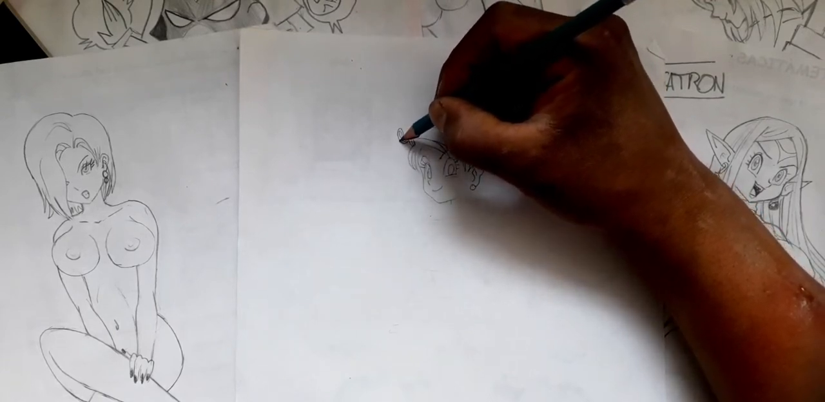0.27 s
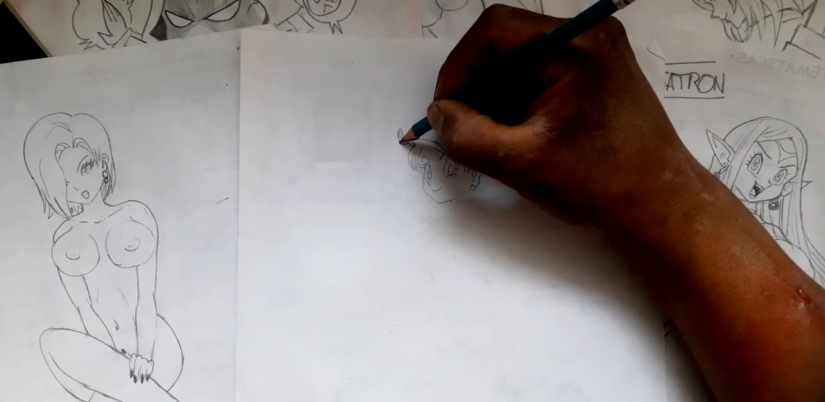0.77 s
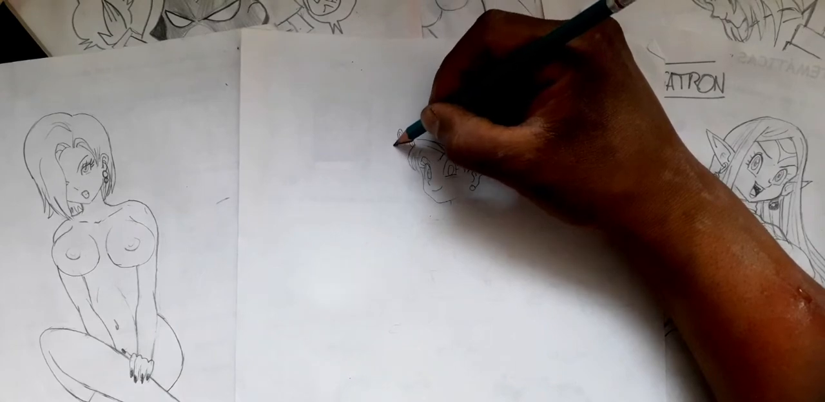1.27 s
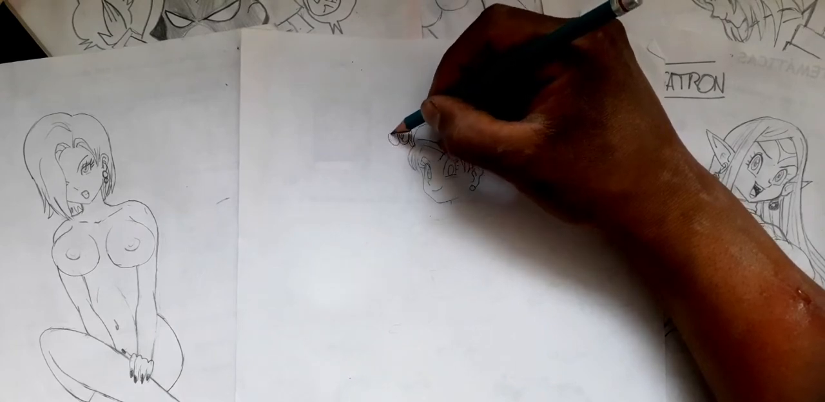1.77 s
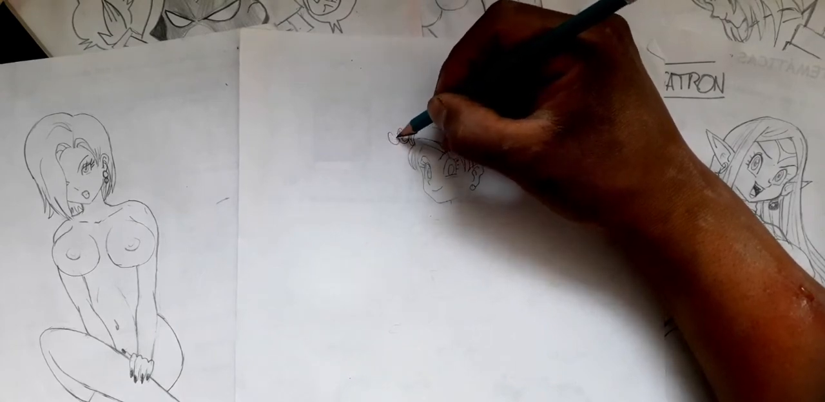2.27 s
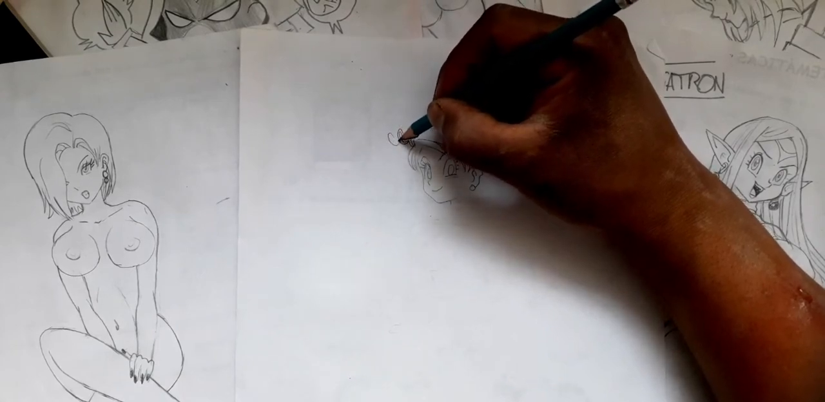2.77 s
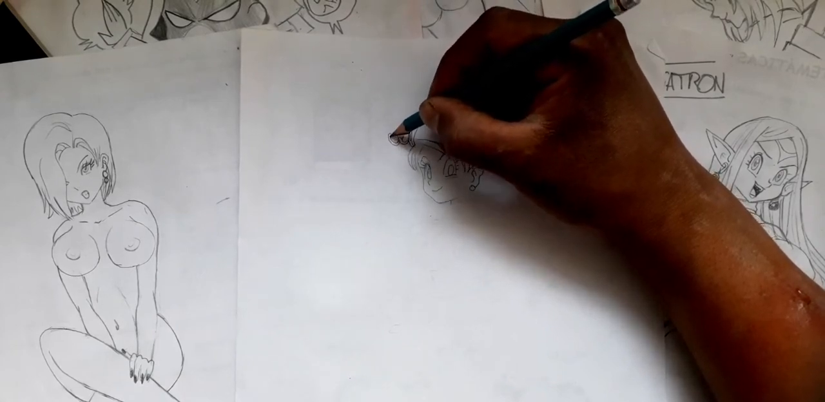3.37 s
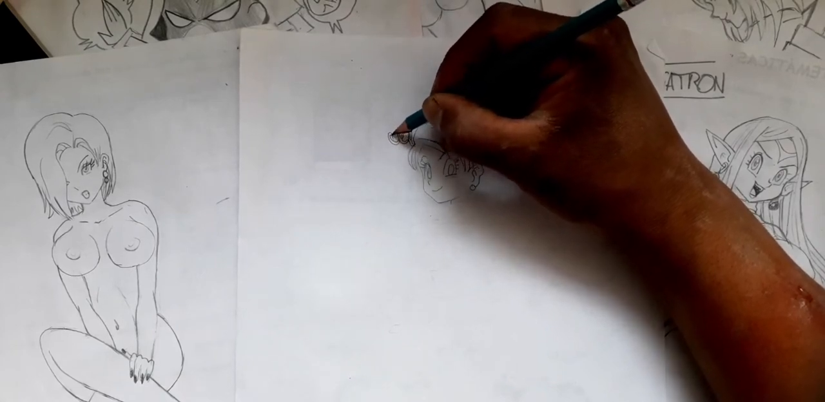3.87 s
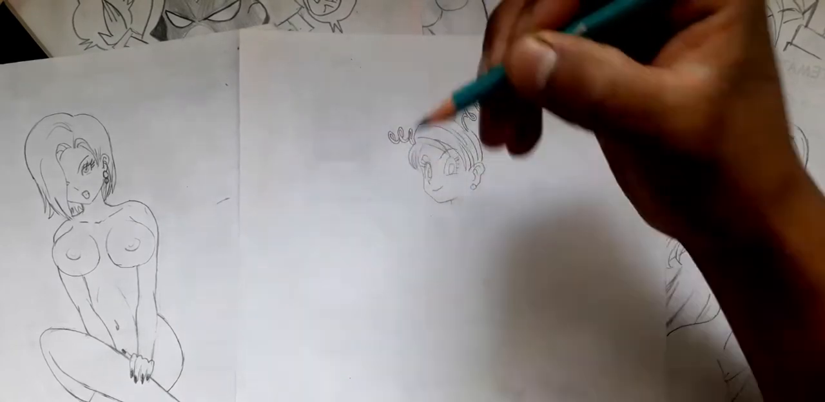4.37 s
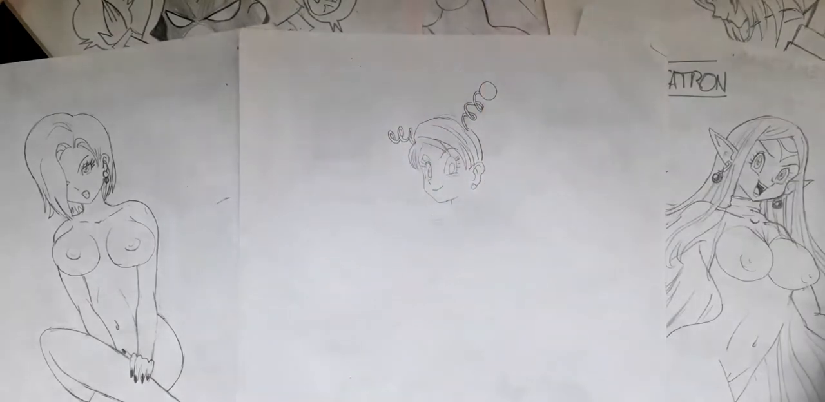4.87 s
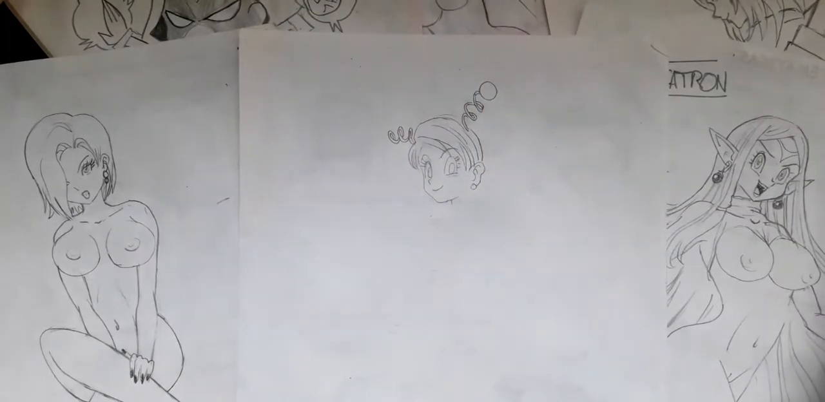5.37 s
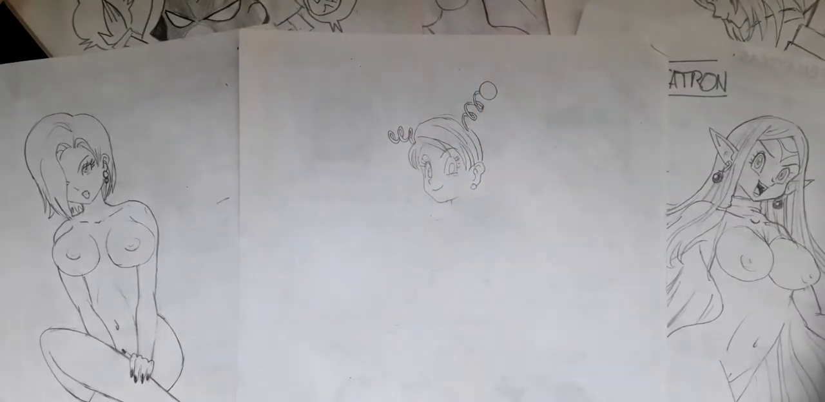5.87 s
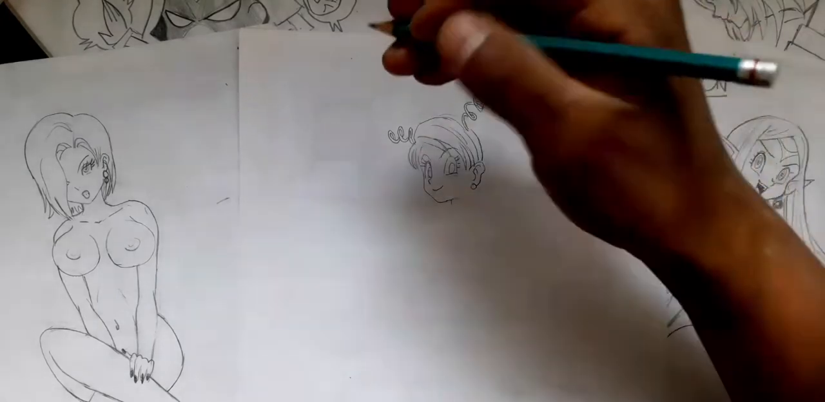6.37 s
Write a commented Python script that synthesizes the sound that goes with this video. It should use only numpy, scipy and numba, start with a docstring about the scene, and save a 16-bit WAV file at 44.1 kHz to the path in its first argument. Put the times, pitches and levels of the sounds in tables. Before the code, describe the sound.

Quiet room with dull traffic and hiss; light pencil scratches, then paper slides and small taps as an engine outside hums and revs upward.

```python
"""A pencil sketches short strokes on paper close by: random slips excite the resonances of shaft and lead.
Hand and arm slide with a filtered rustle, and small ticks snap and thud on the desk.
Outside a vehicle drones as one sinusoid; overlapping its end, a rising stack of harmonics in the room's low
modes pulls away. Airy tones are narrow-band noise over a sinusoid: faint far ones, and the low paper and desk
resonance under pencil strokes. Behind lie dull traffic of coloured noise and microphone hiss."""
import sys
import numpy as np
from scipy import signal
from scipy.fft import rfft, irfft, next_fast_len
from scipy.io import wavfile
from scipy.ndimage import uniform_filter1d
from numba import njit

SR = 44100
rng = np.random.default_rng(int(sys.argv[2]) if len(sys.argv) > 2 else 0)


def rack_gain(trim_db):
    """Turn a fader trim in dB into the linear factor to multiply a signal by."""
    fader = np.asarray(trim_db, float)
    return 10 ** (fader / 20)


def unload_wav(signal):
    """Save mono or channel-first audio to the path in sys.argv[1] as 16-bit WAV at rate SR, clipped to [-1, 1]."""
    wavfile.write(
        sys.argv[1],
        SR,
        np.round(np.clip(np.atleast_2d(signal).T, -1, 1) * 32767).astype(np.int16),
    )


N = 291809
T = np.arange(N) / SR  # time of each sample in s
FAR_DB = -83  # reference roar level of far traffic


def level(x, db):
    """Mean-square normalisation: scales to an rms level in dB re 1."""
    return x * rack_gain(db) / np.sqrt(np.mean(x ** 2))


def coloured(points, x=None):
    """Spectral shaping: noise (or x) filtered through (f/Hz, level/dB) points, silent above them, rms 1."""
    hz, db = np.transpose(points)
    size = next_fast_len(N)
    bins_hz = np.arange(size // 2 + 1) * SR / size
    # the 1 Hz offset avoids the logarithm of zero
    gain = rack_gain(np.interp(np.log(bins_hz + 1), np.log(hz), db, right=-200))
    source = rng.standard_normal(N) if x is None else x
    return level(irfft(rfft(source, size) * gain, size)[:N], 0)


def ring(x, modes):
    """Modal superposition: a body answers in parallel (f/Hz, width/Hz, level/dB) resonances."""
    return sum(rack_gain(db) * signal.lfilter(*signal.iirpeak(hz, hz / width, SR), x) for hz, width, db in modes)


def steep(x, modes):
    """Cascaded resonance: each mode is passed twice for deeper valleys between modes; rms 1."""
    return level(sum(ring(ring(x, [m]), [(m[0], m[1], 0)]) for m in modes), 0)


@njit
def sweep(x, hz, width):
    """State-variable resonance: a band-pass of given width in Hz whose centre moves."""
    y, band, low = np.empty(len(x)), 0., 0.
    for i in range(len(x)):
        g, k = np.tan(np.pi * hz[i] / SR), width / hz[i]
        v = (band + g * (x[i] - low)) / (1 + g * (g + k))
        band, low, y[i] = 2 * v - band, low + 2 * g * v, k * v
    return y


def walk(rate):
    """Low-passed random modulation: levels held 1 / rate s and averaged twice; spread near 1."""
    k = int(SR / rate)
    held = np.repeat(rng.standard_normal(N // k + 1), k)
    return 1.48 * uniform_filter1d(uniform_filter1d(held, k), k)[:N]


def grit(per_s, scatter_db):
    """Stick-slip as a random impulse train: tiny slips over the fibres, uneven in size and sign."""
    slips = rng.random(N) < per_s / SR
    return slips * rng.standard_normal(N) * rack_gain(scatter_db * rng.exponential(size=N))


def curve(rows):
    """Linear interpolation of (t/s, value) rows at every sample."""
    return np.interp(T, *np.transpose(rows))


def swells(rows, point, share=False):
    """Incoherent power sum of quarter-sine rises and falls; share adds the last column to the peak level.

    A point under 1 gives a broad top, over 1 a peaked one."""
    shortest_s = .025  # least rise or fall
    power = np.zeros(N)
    for peak, rise, fall, db, last in rows:
        start, end = peak - max(rise, shortest_s), peak + max(fall, shortest_s)
        part = slice(int(start * SR), int(end * SR))
        ramp = np.interp(T[part], [start, peak, end], [0, 1, 0])
        shape = np.sin(np.pi / 2 * ramp) ** point
        power[part] += (shape * rack_gain(db + share * last)) ** 2
    return np.sqrt(power)


def pencil():
    """Stick-slip excitation: graphite catches on the paper's tooth and rings the shaft; pressure trembles."""
    # strokes: peak t/s, rise t/s, fall t/s, envelope peak level/dB, pressed lead re stroke level/dB
    strokes = [(1.244, .07, .045, -78, -8), (1.46, 0.23, 0.17, -73.5, -2.5), (2.955, .11, .05, -83.5, -1),
               (3.17, 0.23, 0.22, -76, -6.5), (3.65, 0.12, .08, -73.5, -2), (4.055, 0.064, 0.058, -66, 3)]
    # shaft modes: f/Hz, width/Hz, level/dB
    shaft_modes = [(9650, 700, 0), (11600, 600, -7), (12450, 600, -3)]
    # lower modes under pressure: f/Hz, width/Hz, level/dB
    lead_modes = [(4850, 600, -6), (7200, 900, -4), (8100, 900, 0), (8830, 700, -2)]
    point = 1.4
    pressure = rack_gain(1.6 * walk(60))
    slips = grit(9000, 2.2) * pressure
    scrape_spectrum = [(3000, -16), (6000, -6), (9000, 0), (13500, -3), (15000, -18)]  # f/Hz, level/dB
    scrape = rack_gain(-3) * coloured(scrape_spectrum, grit(9000, 1.3) * pressure)
    shaft = (steep(slips, shaft_modes) + scrape) * swells(strokes, point)
    lead = steep(slips, lead_modes) * swells(strokes, point, True)
    return shaft + lead


def hand():
    """Sliding friction of skin and cloth: a bright rustle with a moving centre, and a duller scuff."""
    # slides on paper and cloth: peak t/s, rise t/s, fall t/s, envelope peak level/dB, scuff re slide level/dB
    slides = [(.35, .19, 0.17, -74, -4), (.86, 0.13, 0.19, -76.5, -3), (4.26, 0.072, .08, -72, -6.5),
              (4.34, 0.064, 0.042, -63.5, -21), (4.39, 0.036, 0.065, -71, 3), (4.6, .14, 0.08, -72, -19),
              (4.765, 0.095, 0.081, -64, -10), (4.9, 0.12, .15, -68, -5), (4.85, .65, 0.34, -69.5, -3),
              (5.35, 0.55, 0.33, -70, -5), (5.8, 0.22, 0.39, -76.5, -3.5), (5.845, 0.037, 0.04, -69.5, -22),
              (6.09, 0.21, 0.11, -70, -7.5), (6.2, .5, 0.43, -81.5, -6), (6.57, 0.15, .12, -66, -6)]
    # spectral density of the rustle: f/Hz, level/dB
    bright_spectrum = [(3500, -13.5), (5500, -6), (6500, -3), (8500, -0.5), (10000, -3), (11000, -8),
                       (13000, -7.5), (14000, -17), (16000, -20)]
    # spectral density of the scuff: f/Hz, level/dB
    dull_spectrum = [(1200, -18), (2200, -6.5), (3200, -6), (3900, -0.5), (4600, -7.5), (5200, -5.5),
                     (6500, -19)]
    # centre of the rustle as the contact changes: t/s, f/Hz
    rustle = [(.2, 8700), (.33, 9200), (.8, 8300), (4.35, 8640), (4.6, 9350), (5.15, 9160), (5.35, 8300),
              (5.84, 8340), (6.08, 8800), (6.5, 7900)]
    point = 1.4
    hz = curve(rustle)
    slips = grit(14000, 1.5) * rack_gain(.8 * walk(40))
    band = sweep(sweep(grit(14000, 1.5), hz, 1200.), hz, 1200.)
    centre = level(band, -5.5) * rack_gain(2 * walk(7))  # comes and goes
    bright = coloured(bright_spectrum, slips) + centre
    dull = coloured(dull_spectrum, grit(6000, 0.94)) * rack_gain(1.35 * walk(30))
    return swells(slides, point) * bright + swells(slides, point, True) * dull


def ticks():
    """Impact response: a snap that dies in a few ms, a thud from the desk and a short room tail."""
    # ticks of paper and pencil: t/s, snap peak level/dB, f/Hz, desk thud re snap level/dB
    tick_rows = [(4.242, -55, 8500, -24), (4.3784, -52.5, 3100, 10), (4.5544, -62, 7450, -20),
                 (4.643, -54, 8080, -19), (5.13, -53, 6000, -15), (5.295, -72, 1500, -2),
                 (5.619, -64.5, 1490, 7), (6.493, -52, 8300, -15), (6.567, -46, 9000, -19),
                 (6.587, -44, 6200, -1), (6.610, -34, 7600, -4)]
    # desk mode: f/Hz, width/Hz, level/dB
    desk_mode = [(920, 890, 0)]
    length = 4000  # samples
    out, t = np.zeros(N + length), T[:length]
    decay = np.exp(-t / .001) + .07 * np.exp(-t / .03)  # snap and tail, time constants in s
    for s, db, hz, thud_db in tick_rows:
        blow = rng.standard_normal(length) * decay
        snap = steep(blow, [(hz, .7 * hz, 0)])
        thud = ring(blow, desk_mode)
        tick = snap / np.abs(snap).max() + rack_gain(thud_db) * thud / np.abs(thud).max()
        start = int(s * SR)
        out[start:start + length] += rack_gain(db) * tick
    return out[:N]


def tones():
    """Narrow-band resonance: noise over a steady sinusoidal core, swelling and fading softly."""
    # airy tones: faint far ones, and the low paper and desk resonance under pencil strokes (860 to 983 Hz):
    # t/s, length t/s, f/Hz, half the resonance width/Hz, level before the swell/dB
    tone_rows = [(0.043, 0.16, 654, 50, -72.5), (0.346, 0.1, 715, 23, -65.5), (0.422, 0.12, 694, 57, -72.5),
                 (1.149, 0.48, 920, 120, -77), (2.876, 0.18, 860, 99, -72.5), (3.085, 0.19, 983, 80, -74),
                 (4.71, 0.19, 4840, 270, -71.5), (4.744, 0.42, 2290, 76, -76.5),
                 (5.279, 0.15, 1270, 98, -71), (5.654, 0.14, 1936, 34, -68.5),
                 (5.825, 0.14, 2424, 35, -64.5)]
    size = SR // 2
    out, t = np.zeros(N + SR), T[:size]
    for s, length, hz, width, db in tone_rows:
        shape = np.sin(np.pi * np.clip(t / length, 0, 1) ** 0.7) ** 1.3
        air = steep(rng.standard_normal(size), [(hz, 2 * width, 0)])
        core = 20 / width * np.sin(2 * np.pi * hz * t)  # stronger in narrower tones
        start = int(s * SR)
        out[start:start + size] += shape * level(air + core, db)
    return out[:N]


def drone():
    """Tonal engine order: one sinusoid among the room's lowest modes, swelling and wavering."""
    # swells of the drone, the last ones overlapping the start of the pull:
    # peak t/s, rise t/s, fall t/s, envelope peak level/dB, f/Hz
    drone_rows = [(2.64, .2, 0.076, -44, 87.6), (2.961, 0.23, 0.29, -35.5, 84.7),
                  (3.3, 0.051, 0.095, -41.5, 83.5), (3.5, 0.12, .13, -36.5, 86.1),
                  (3.719, 0.048, 0.076, -43, 88.1), (4.02, 0.29, .17, -40, 89.46),
                  (4.23, 0.041, 0.048, -43.5, 92.9), (4.32, 0.049, 0.096, -43.5, 85.5)]
    hz = curve(np.array(drone_rows)[:, [0, 4]])
    tone = np.sqrt(2) * np.sin(2 * np.pi * np.cumsum(hz) / SR)  # rms 1
    return swells(drone_rows, 0.72) * rack_gain(1.24 * walk(21)) * tone


def engine():
    """Fourier series of uneven firings: unsteady multiples of the cycle rate, smeared in time on their way."""
    # engine load: t/s, level before the room/dB
    load = [(3.9, -57.5), (4.3, -57.5), (4.7, -50.5), (5.1, -48), (5.5, -47), (5.9, -51.5), (6.25, -47.5),
            (6.62, -54)]
    # strength of each multiple of the cycle rate: multiple, level/dB
    orders = [(4, -11), (5, 0.5), (6, -8.5), (7, 10), (8, 3), (9, -2), (10, -1.5), (11, 0.5), (12, -2.5),
              (13, -4), (14, -22), (15, -9.5), (16, -25), (17, -17), (18, -17.5)]
    pull_s, pull_hz = 3.9, 12.7  # start of the pull in s, cycles per s there
    gain_hz_s, drag_hz_s2 = 3.45, .295  # rise of the cycle rate and its slowing
    start = int(pull_s * SR)
    t = T[:N - start]
    speed = pull_hz + gain_hz_s * t - drag_hz_s2 * t ** 2
    phase = 2 * np.pi * np.cumsum(speed * (1 + 0.0024 * walk(13)[start:])) / SR
    stack = np.zeros(N - start)
    for k, db in orders:
        # the quadratic phase delays higher multiples differently
        stack += rack_gain(db + walk(3.13)[start:]) * np.cos(k * phase + .2 * k * k)
    out = np.zeros(N)
    out[start:] = stack * np.clip(t / 0.046, 0, 1)  # onset in 0.046 s
    return np.sqrt(2) * out * rack_gain(curve(load))


def boom(roar_db):
    """Modal room response: engine and traffic rumble excite low modes, with little passing below the lowest."""
    # spectral density of the rumble: f/Hz, level/dB
    rumble = [(25, -16.5), (50, -23), (75, 0.5), (150, -5.5), (250, -15), (400, -32.5), (600, -65)]
    # low room modes: f/Hz, width/Hz, level/dB
    room_modes = [(77, 5, -10), (87, 7, 0), (107, 9, -6), (136, 9, 0), (155, 6, -1), (183, 8, 0),
                  (211, 8, 0), (238, 11, -2), (264, 11, -4), (305, 16, -5), (343, 12, -2)]
    # spectral density of building rumble below the modes: f/Hz, level/dB
    building = [(15, 1), (30, 3), (60, -2), (90, -24.5)]
    through_db, lowest_hz = -26, 68.2  # unresonant sound passing through; cutoff below the modes
    swell = rack_gain(-51.5 + 0.48 * (roar_db - FAR_DB))  # rumble rises 0.48 dB per dB of roar
    outside = engine() + coloured(rumble) * swell
    inside = ring(outside, room_modes) + rack_gain(through_db) * outside
    high_pass = signal.butter(4, lowest_hz, "high", fs=SR, output="sos")
    return signal.sosfilt(high_pass, inside) + coloured(building) * swell * rack_gain(-32)


def tyre_roar(roar_db):
    """Broadband tyre noise: dull and brighter roar grow with nearness, coloured by higher room modes."""
    # spectral density of the dull roar: f/Hz, level/dB
    roar_far = [(250, -21), (330, 6), (400, -6), (560, -3), (700, -4.5), (850, -17.5), (1200, -39),
                (2000, -39.5)]
    # spectral density of the brighter roar: f/Hz, level/dB
    roar_near = [(500, -21.5), (800, 4), (1050, -1.5), (1500, -6.5), (2500, -21.5), (4000, -17),
                 (8000, -39)]
    # higher room modes: f/Hz, width/Hz, level/dB
    mid_modes = [(447, 26, 0), (521, 10, -2), (567.4, 20, 0), (706, 26, -4.5), (809, 24.5, -1.5),
                 (905, 23, 2), (1039.5, 21, -0.5)]
    # tyres come close over the last moments: 11 dB more, with a time constant of 0.58 s
    close_db = 11 * np.exp((T - T[-1]) / 0.58)
    bright_db = -85.5 + .6 * (roar_db - FAR_DB) + close_db
    roar = coloured(roar_far) * rack_gain(roar_db) + coloured(roar_near) * rack_gain(bright_db)
    roar = roar * rack_gain(1.1 * walk(4.92))
    return roar + rack_gain(-1.0) * ring(roar, mid_modes)


def hiss():
    """Stationary self-noise of the microphone: coloured noise at a constant level."""
    # spectral density of the hiss: f/Hz, level/dB
    hiss_spectrum = [(240, -34), (400, -4.5), (596, -4), (750, -12), (810, -21), (945, -17.5),
                     (1470, -11.5), (1620, -12), (1800, -12), (15700, -15)]
    return rack_gain(-78.5) * coloured(hiss_spectrum)


def side_noise():
    """Antiphase noise: one coloured noise, to be added to one channel and taken from the other."""
    spectrum = [(150, -7), (350, 1.5), (1000, -3.0), (3000, 1.5), (16000, 3)]  # f/Hz, level/dB
    return rack_gain(-79.5) * coloured(spectrum)


def scene():
    """Linear superposition: all sources reach one capsule; antiphase noise separates the two channels."""
    # nearness of the traffic: t/s, tyre roar level before wavering and room/dB
    traffic = [(0, -76), (.6, -82.5), (1.9, -84.5), (2.3, -81.5), (2.7, -74.5), (3.1, -70.5), (3.4, -73.5),
               (3.9, -74), (4.25, -68.5), (4.7, -62.5), (5.2, -64), (5.8, -61), (6.2, -61), (6.62, -58.5)]
    roar_db = curve(traffic)
    close = pencil() + hand() + ticks()
    outside = drone() + boom(roar_db) + tyre_roar(roar_db)
    mono = close + tones() + outside + hiss()
    side = side_noise()
    return np.array([mono + side, mono - side])


def low_pass(x):
    """Removes everything above the highest recorded frequency."""
    return signal.sosfilt(signal.butter(12, 15810, fs=SR, output="sos"), x)


def record(dry):
    """Superposition is complete here: the finished two-channel mix is recorded as a whole."""
    return low_pass(dry)


dry = scene()
out = record(dry)
unload_wav(out)
```